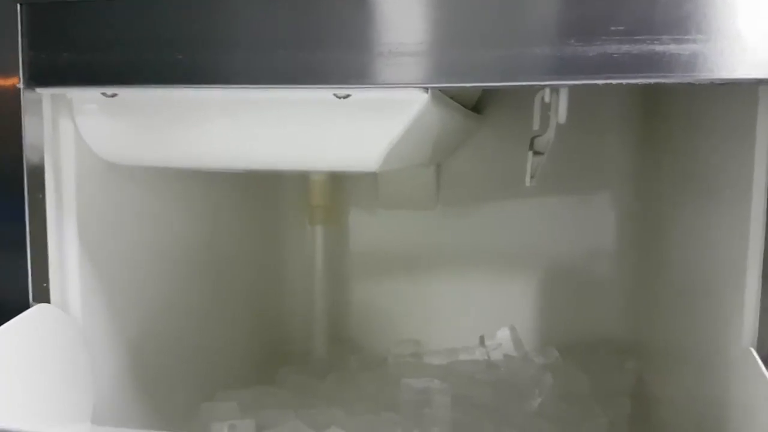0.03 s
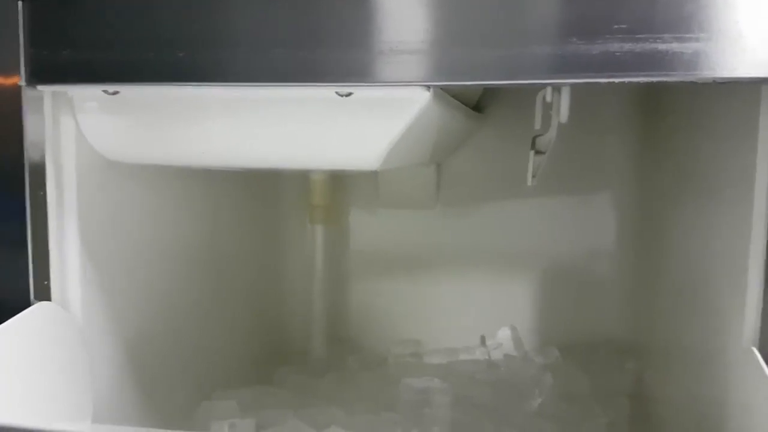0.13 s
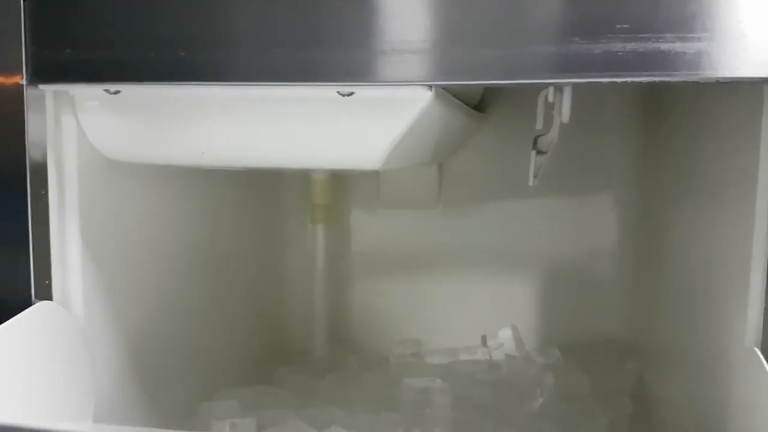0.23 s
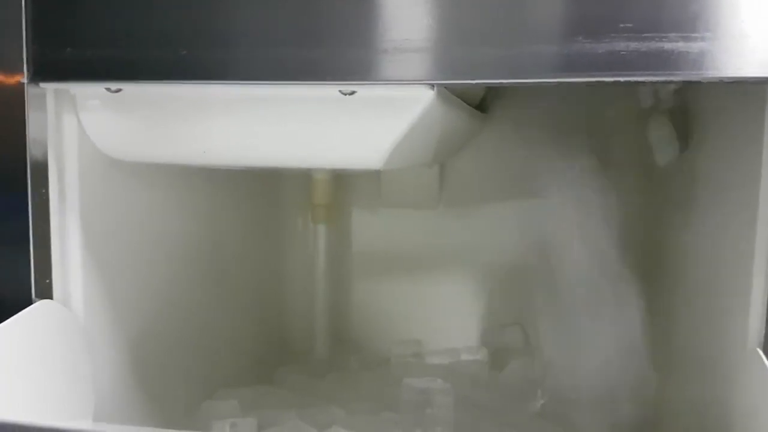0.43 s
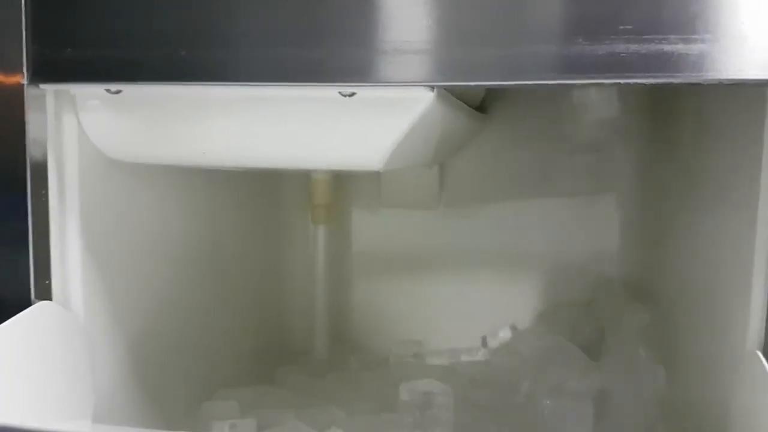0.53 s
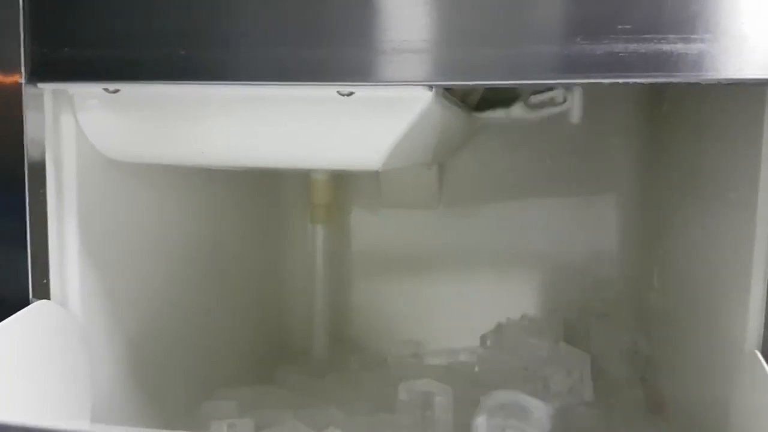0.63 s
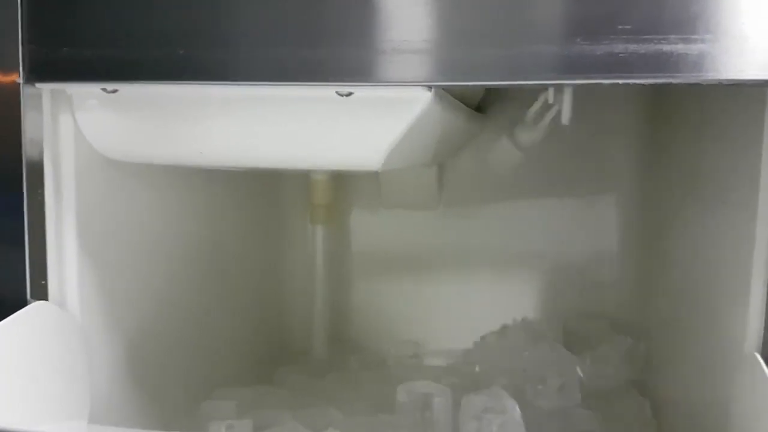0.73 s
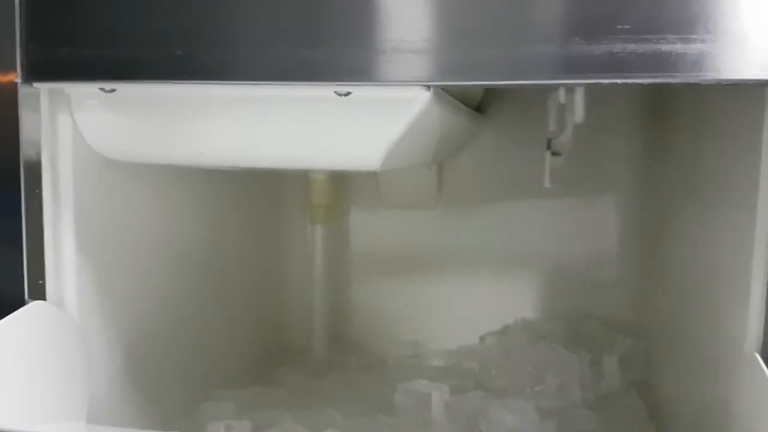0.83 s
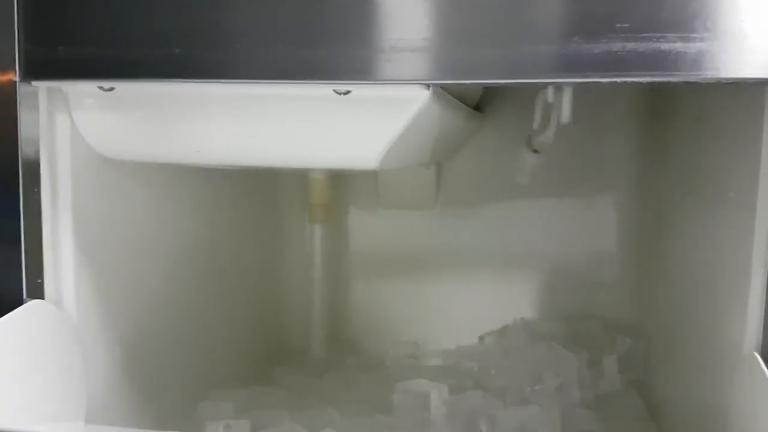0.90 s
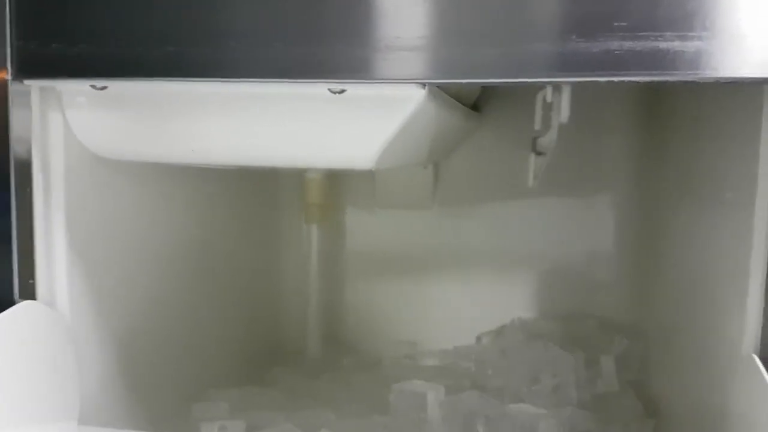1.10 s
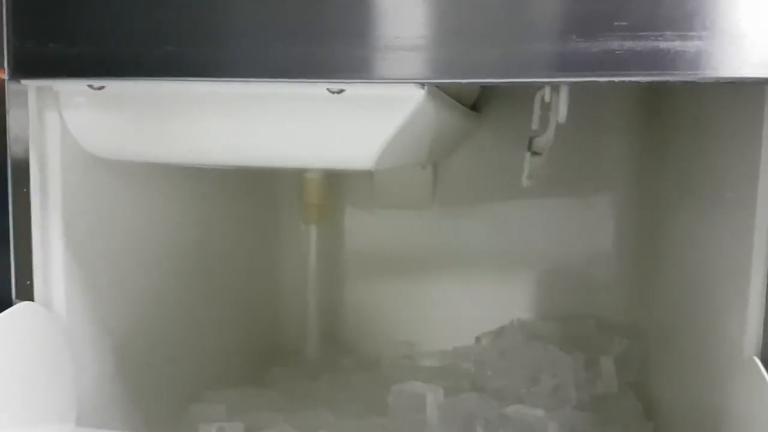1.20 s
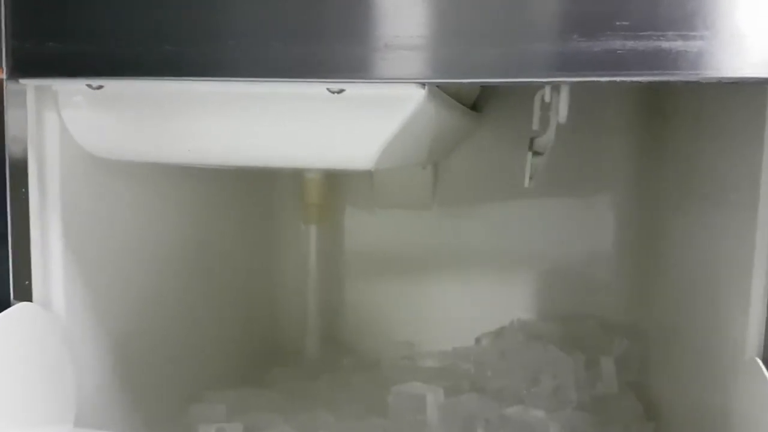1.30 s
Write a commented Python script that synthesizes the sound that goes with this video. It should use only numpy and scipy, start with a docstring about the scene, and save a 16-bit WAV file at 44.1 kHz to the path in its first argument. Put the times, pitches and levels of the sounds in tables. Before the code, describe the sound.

A batch of ice clatters down into a storage bin while the ice machine hums.

```python
"""At an ice machine, a batch of cubes drops into the storage bin and settles on the heap.
The compressor hums and the fan rushes throughout. Each blow of ice thumps the bin, rings its panels,
and clacks and ticks between the walls; loose cubes rattle in between, and one clink comes near the end.
The ice echoes in the bin and room. An automatic gain control turns everything down at the crash,
so the hum sinks and then comes back."""
import sys
import numpy as np
from scipy import signal
from scipy.fft import rfft, irfft
from scipy.io import wavfile
from scipy.ndimage import uniform_filter1d, minimum_filter1d

SR = 44100
rng = np.random.default_rng(int(sys.argv[2]) if len(sys.argv) > 2 else 0)


def unload_audio(sound):
    """Save the sound as a 16-bit wav file, at the path given as the first command line argument."""
    columns = np.transpose(np.atleast_2d(sound))
    # keep every value between -1 and 1, then stretch to whole-number steps
    steps = np.round(np.clip(columns, -1, 1) * 32767)
    wavfile.write(sys.argv[1], SR, steps.astype(np.int16))


N = 59535

# Fade time is how long a sound takes to drop 60 dB. Likeness is 1 when left and right match.
# Balance is left minus right. A colour says how strong a noise is at each pitch.
# compressor tones: (pitch [Hz], level [dB])
HUM_TONES = [(97, -47), (145.3, -42), (198, -41.5), (220.7, -38), (293, -47), (436, -38), (484.5, -46.5),
             (985, -49), (1179, -62), (1868, -52), (2013, -55), (2067, -54)]
# rush of the fan: (pitch [Hz], level [dB])
FAN_COLOUR = [(25, -27), (48, -5.5), (70, -16), (110, -14.5), (190, 0.5), (250, -2.5), (350, -5),
              (480, -12), (620, -11.5), (950, -17.5), (1400, -21.5), (2000, -20.5), (3000, -26.5),
              (4700, -37.5), (7000, -45), (9500, -50.5), (15500, -48.5)]
# how alike the fan is on both sides: (pitch [Hz], likeness [0-1])
FAN_LIKENESS = [(100, 0.89), (300, 0.91), (700, 0.27), (2000, 0.13), (10000, 0.14)]
# which side the fan leans to: (pitch [Hz], balance [dB])
FAN_BALANCE = [(200, 2.5), (600, 0.5), (1200, -1), (2500, 0.5), (5000, 6), (8500, 17.5), (14000, 10)]
# how loudly the loose cubes rattle: (time [s], level [dB])
RATTLE_LEVELS = [(.23, -47.5), (.29, -23.5), (.39, -35.5), (.45, -33), (.53, -31), (0.591, -4.5),
                 (.66, -21), (0.782, -17), (.81, -32), (0.901, -35), (1.02, -69), (1.1, -47)]
# knock of a cube: (pitch [Hz], level [dB])
CLACK_COLOUR = [(80, -42), (170, -16), (260, 1.5), (370, -15.5), (620, 6), (950, 0.5), (1300, 1),
                (2100, 0.5), (2600, -5), (3400, -5.5), (4500, -18), (7000, -26), (10000, -62)]
# crack of brittle edges: (pitch [Hz], level [dB])
TICK_COLOUR = [(1500, 1), (3500, 8.5), (5000, 10), (6600, 4), (9000, -6.5), (12000, 2), (15500, -0.5)]
# which side the ticks lean to: (pitch [Hz], balance [dB])
TICK_BALANCE = [(2500, 19), (5000, 7), (8500, 23), (13000, 10)]
# blows of ice: (time [s], thump level [dB], panel level [dB], panel pitch [Hz],
# clack level [dB], clack pitch [Hz], tick level [dB])
ICE_BLOWS = [(0.239, -32, -33, 475, -27.5, 2040, -38.5), (.246, -29, -21.5, 450, -31, 2170, -38),
             (0.264, -18, -35, 600, -20.5, 2030, -49), (.279, -12, -9, 496, -13, 1340, -23.5),
             (0.309, -13, -16.5, 460, -26, 1360, -38), (.329, -15, -23.5, 480, -17, 950, -34),
             (.341, -20.5, -19.5, 552, -34, 1910, -50), (.375, -25, -21, 577, -26, 910, -57),
             (.408, -21, -13, 293, -15.5, 1500, -20), (.420, -18, -13.5, 490, -12, 1480, -26),
             (.438, -19, -30, 550, -18.5, 1050, -24), (.464, -23, -28, 480, -25, 1090, -30.5),
             (.491, -12.5, -15.5, 297, -7.5, 1990, -22.5), (.507, -15, -22, 477, -8, 1980, -22),
             (.524, -25, -27, 440, -41, 1600, -31), (0.546, -25, -13.5, 410, -10.5, 1800, -22),
             (.557, -23, -22.5, 450, 3.5, 1020, -14), (.566, -19, -8.5, 570, 1, 900, -10.5),
             (.575, -18, -6.5, 343, -0.5, 1780, -8.5), (.589, -13, -8, 590, 0.5, 1230, -9),
             (.598, -18, -9, 396, 0.5, 1300, -33), (.606, -9, -3.5, 255, -1, 1270, -43),
             (.622, -11, -13, 575, -9.5, 845, -36), (0.642, -39, -13, 670, -3.5, 1890, -18),
             (.664, -19, -10, 680, -2.5, 1330, -40), (.692, -24, -18, 620, -9, 2000, -24),
             (.713, -19.5, -29, 600, -5, 1930, -17.5), (.733, -17, -16, 500, -8, 1940, -25),
             (.751, -41, -18.5, 500, -11.5, 1700, -20.5), (.774, -40, -20, 239, -9, 2120, -34),
             (0.859, -36, -31, 400, -20.5, 2450, -30), (.880, -52, -34, 308, -19.5, 2040, -31.5),
             (.894, -55, -28, 500, -19, 1440, -36), (.930, -40, -41, 404, -24.5, 1500, -34),
             (.960, -59, -42, 500, -24.5, 1700, -44), (1.015, -58, -42, 504, -33, 2570, -47)]
# low tones of the whole bin: (pitch [Hz], level [dB], fade time [s])
THUMP_TONES = [(114, -0.5, 0.17), (130.4, 0.5, 0.19), (148.5, -1.5, 0.22), (170.8, -5, 0.2),
               (189.2, -1, 0.12)]
# tones of its panels: (pitch [Hz], level [dB], fade time [s])
PANEL_TONES = [(242.4, -6.5, 0.1), (292, -5, 0.13), (318, -10, 0.13), (403.3, -8, 0.1), (475, -7.5, 0.2),
               (506.6, -7.5, 0.13), (531.5, -5, 0.082), (585.2, -9, 0.22), (645, -14.5, 0.24),
               (673, -15, 0.097)]
# higher tones of its walls: (pitch [Hz], level [dB], fade time [s])
WALL_TONES = [(819, -7.5, 0.053), (847.4, -13.5, .16), (907, -20.5, 0.25), (1015, -19.5, .16),
              (1214, -16.5, 0.14), (1245, -15, 0.11), (1247, -10.5, 0.099), (1523, -17, 0.13),
              (1778, -11, 0.11), (1852, -12.5, .16)]
# tones of the late clink: (pitch [Hz], level [dB], fade time [s])
CLINK_TONES = [(1140, 2.5, 0.031), (1295, -5, 0.05), (1480, 1.5, 0.037), (1725, -4, 0.044),
               (1817, 7, 0.033), (2155, -4, 0.035), (2700, -7, 0.034), (3120, -8, 0.026), (3390, -1, 0.025)]
# colour of the echo, with the bass turned down: (pitch [Hz], level [dB])
REFLECTION_COLOUR = [(150, -10), (320, 0), (15000, 0)]
# how alike the echo is on both sides: (pitch [Hz], likeness [0-1])
ECHO_LIKENESS = [(100, 0.81), (250, 1), (500, 0.78), (1000, 0.18), (10000, 0.08)]
# how long the bin and room echo: (pitch [Hz], fade time [s])
ECHO_FADES = [(100, 1), (500, 0.69), (2000, 0.49), (6000, 0.48), (15000, 0.44)]

CLACK_RISE_S, TICK_RISE_S, CLACK_BALANCE_DB = 0.0026, 0.00033, -2
CUBE_LOW_HZ, CUBE_HIGH_HZ = 901, 2617


def gain(db):
    """Turns decibels into a number to multiply by."""
    return 10 ** (np.asarray(db) / 20)


def normalise(sound):
    """Scales a sound to an average power of 1."""
    return sound / np.sqrt(np.mean(sound ** 2) + 1e-20)


def look_up(table, hz):
    """Reads between the rows of a table, on a scale of octaves."""
    pitches, values = np.transpose(table)
    return np.interp(np.log(hz + 1), np.log(pitches), values)


def add(mix, start_s, sound):
    """Mixes a sound in at the given time."""
    part = mix[:, round(start_s * SR):][:, :sound.shape[-1]]
    part += sound[..., :part.shape[1]]


def pan(balance_db):
    """Left and right gains for a balance."""
    return gain(np.array([[balance_db / 2], [-balance_db / 2]]))


def boost(hz, centre_hz, db, octaves):
    """A bell-shaped bump of extra decibels around one pitch."""
    return db * np.exp(-(np.log2((hz + 1) / centre_hz) / octaves) ** 2)


def strike(t, rise_s, fade_s):
    """The loudness of something struck: a quick rise, then a smooth fade."""
    return np.minimum(t / rise_s, 1) * gain(-60 * t / fade_s)


def noise(colour, likeness, balance_db, size):
    """Stereo noise with the given colour, likeness and balance."""
    left, other = rfft(rng.standard_normal((2, size)))
    right = likeness * left + np.sqrt(1 - likeness ** 2) * other
    pair = np.array([left * gain(balance_db / 2), right * gain(-balance_db / 2)])
    hz = np.fft.rfftfreq(size, 1 / SR)
    return normalise(irfft(pair * gain(look_up(colour, hz)), size))


def machine(waver_radians=0.43, drift_hz=10, fan_db=-31):
    """The compressor hums with slightly wavering tones over the rush of the fan."""
    t, hz = np.arange(N) / SR, np.fft.rfftfreq(N, 1 / SR)
    jitter = rfft(rng.standard_normal((len(HUM_TONES), N)))
    drifts = waver_radians * normalise(irfft(jitter / (1 + (hz / drift_hz) ** 4), N))
    hum = sum(gain(db) * np.sqrt(2) * np.sin(2 * np.pi * (pitch * t + rng.random()) + drift)
              for (pitch, db), drift in zip(HUM_TONES, drifts))
    fan = noise(FAN_COLOUR, look_up(FAN_LIKENESS, hz), look_up(FAN_BALANCE, hz), N)
    return hum + gain(fan_db) * fan


def rattle(cubes=16, hits_per_s=700):
    """Loose cubes tumble, each repeating its own clack and tick at random moments."""
    t, mix = np.arange(2 ** 12) / SR, np.zeros((2, N))
    for _ in range(cubes):
        hits = rng.random(N) < hits_per_s / cubes / SR
        strength = gain(3 * np.minimum(rng.exponential(1, N), 3))
        cube = clack(t, fade_s=0.032, pitch_hz=rng.uniform(CUBE_LOW_HZ, CUBE_HIGH_HZ))
        cube += gain(-13.5) * tick(t, fade_s=0.014)
        mix += signal.fftconvolve((hits * strength)[None], cube, axes=1)[:, :N]  # one copy per hit
    level_db = np.interp(np.arange(N) / SR, *np.transpose(RATTLE_LEVELS))
    return normalise(mix) * gain(level_db)


def clack(t, fade_s, pitch_hz):
    """A knock scattered by the close walls, with four clear tones from the cubes themselves."""
    height, phase, right_shift = rng.random((3, 4, 1))
    cube_hz = CUBE_LOW_HZ * (CUBE_HIGH_HZ / CUBE_LOW_HZ) ** height
    phases = np.array([phase, phase + 0.26 * right_shift])
    tones = np.sin(2 * np.pi * (cube_hz * t + phases)).sum(1)
    cube_ring = gain(-9) * normalise(tones) * strike(t, TICK_RISE_S, fade_s=0.074)
    peak = gain(boost(np.fft.rfftfreq(len(t), 1 / SR), pitch_hz, db=10, octaves=0.23))
    scatter = noise(CLACK_COLOUR, likeness=0.52, balance_db=CLACK_BALANCE_DB, size=len(t))
    knock = normalise(irfft(rfft(scatter) * peak))
    return knock * strike(t, CLACK_RISE_S, fade_s) + cube_ring


def tick(t, fade_s, grit_db=3, glassy_hz=(3410, 7530)):
    """Brittle edges meet with a gritty crack, and the ice briefly rings like glass."""
    flicker = normalise(uniform_filter1d(rng.standard_normal(len(t)), size=30))
    grit = normalise(gain(grit_db * flicker))
    balance_db = look_up(TICK_BALANCE, np.fft.rfftfreq(len(t), 1 / SR))
    crack = noise(TICK_COLOUR, likeness=0.16, balance_db=balance_db, size=len(t))
    tones = sum(np.sin(2 * np.pi * (hz * t + rng.random((2, 1)))) * pan(look_up(TICK_BALANCE, hz))
                for hz in rng.uniform(*glassy_hz, size=3))
    glassy_ring = gain(-13.5) * normalise(tones) * strike(t, TICK_RISE_S, fade_s=0.1)
    return crack * grit * strike(t, TICK_RISE_S, fade_s) + glassy_ring


def blows():
    """Slabs and cubes hit the wall and the heap, shaking the bin each time."""
    t, mix = np.arange(2 ** 13) / SR, np.zeros((2, N))
    for start_s, thump_db, panel_db, panel_hz, clack_db, clack_hz, tick_db in ICE_BLOWS:
        thump = gain(thump_db) * ring(THUMP_TONES, t, rise_s=0.0055)
        # the spot that is struck brings out some panel tones more than others
        panel_tones = [(hz, db + boost(hz, panel_hz, db=8.5, octaves=0.22), fade_s)
                       for hz, db, fade_s in PANEL_TONES]
        panels = gain(panel_db) * ring(panel_tones, t, rise_s=0.0058)
        knock = clack(t, fade_s=0.08, pitch_hz=clack_hz) + walls(t) * pan(CLACK_BALANCE_DB)
        crack = tick(t, fade_s=0.078)
        add(mix, start_s, thump + panels + gain(clack_db) * knock + gain(tick_db) * crack)
    return mix


def ring(tones, t, rise_s, spread_db=3):
    """A struck object rings with its own tones, in a slightly different blend each time."""
    return sum(gain(db + spread_db * rng.standard_normal())
               * strike(t, rise_s, fade_s) * np.sin(2 * np.pi * hz * t) for hz, db, fade_s in tones)


def walls(t):
    """The bin walls ring; each tone reaches left and right out of step by a random amount."""
    return sum(gain(db) * strike(t, CLACK_RISE_S, fade_s)
               * np.sin(2 * np.pi * (hz * t + rng.random((2, 1)))) for hz, db, fade_s in WALL_TONES)


def echo(sound):
    """Many close reflections from the bin and room, with the low pitches lasting longest."""
    likeness = look_up(ECHO_LIKENESS, np.fft.rfftfreq(SR, 1 / SR))
    reflections = noise(REFLECTION_COLOUR, likeness, balance_db=0, size=SR)
    hz, t, bands = signal.stft(reflections, SR, nperseg=256)
    fades = strike(t, rise_s=0.0064, fade_s=look_up(ECHO_FADES, hz)[:, None])
    tail = signal.istft(bands * fades, SR, nperseg=256)[1]
    return signal.fftconvolve(sound, tail / np.linalg.norm(tail[0]), axes=1)[:, :N]


def clink():
    """One short, bright ring as the ice settles, a little to the right."""
    t = np.arange(2 ** 13) / SR
    return gain(-12.5) * ring(CLINK_TONES, t, rise_s=0.002) * pan(-3.5)


def scene(bass_cut_hz=106, echo_db=-9, left_delay_s=0.00005):
    """Ice, with its deep bass cut away, falls into the echoing bin while the machine runs."""
    ice = blows()
    add(ice, start_s=0.894, sound=clink())
    ice += rattle()
    ice = signal.sosfilt(signal.butter(6, bass_cut_hz, "high", fs=SR, output="sos"), ice)
    left, right = ice + gain(echo_db) * echo(ice) + machine()
    return np.array([np.roll(left, round(left_delay_s * SR)), right])


def record(dry, limit_db=-11, hold_s=0.58, recover_db_per_s=50.5, treble_cut_hz=15900):
    """The gain control turns loud sound down at once, waits, then recovers; the top treble is cut."""
    power = uniform_filter1d((dry ** 2).mean(0), size=600)
    excess_db = np.maximum(10 * np.log10(abs(power) + 1e-12) - limit_db, 0)
    hold = int(hold_s * SR) | 1  # an odd number of samples
    held_db = -minimum_filter1d(-excess_db, hold, origin=hold // 2, mode="constant")  # recent peak
    recovery_db = recover_db_per_s * np.arange(N) / SR
    cut_db = np.maximum.accumulate(held_db + recovery_db) - recovery_db
    turned_down = dry * gain(-uniform_filter1d(cut_db, size=200))
    treble_filter = signal.firwin(301, treble_cut_hz, window=("kaiser", 9), fs=SR)
    return signal.oaconvolve(turned_down, treble_filter[None], "same")


dry = scene()
out = record(dry)
unload_audio(out)
```